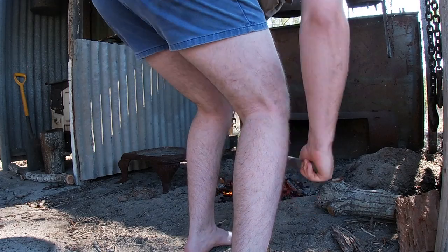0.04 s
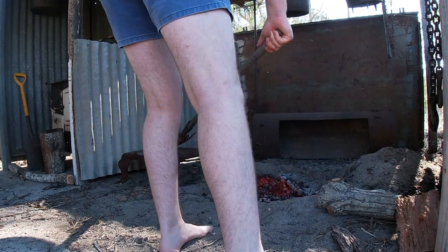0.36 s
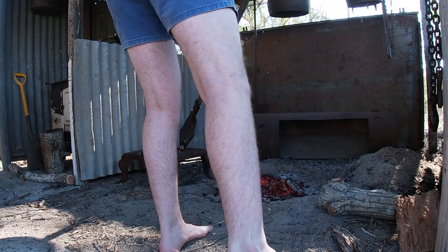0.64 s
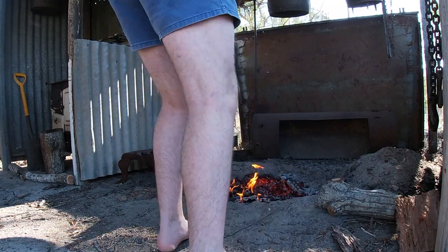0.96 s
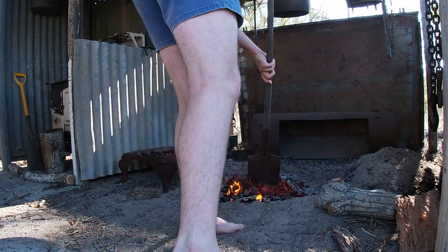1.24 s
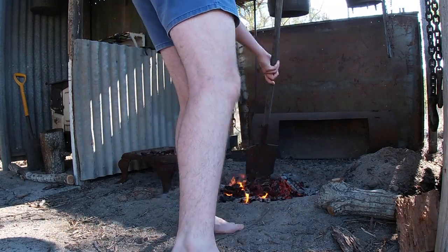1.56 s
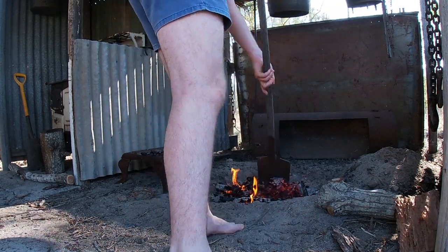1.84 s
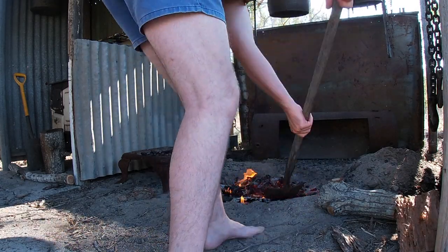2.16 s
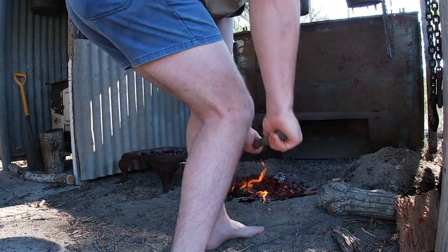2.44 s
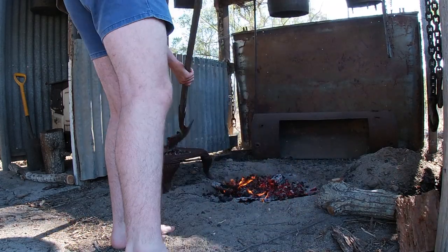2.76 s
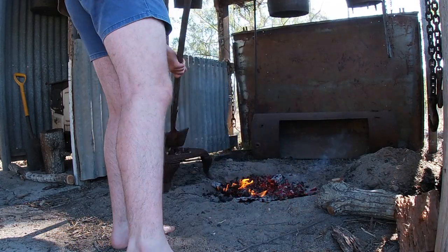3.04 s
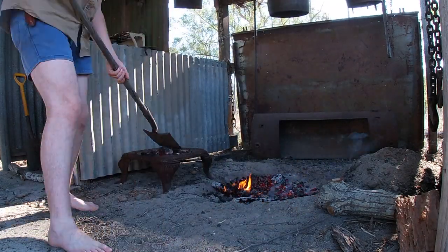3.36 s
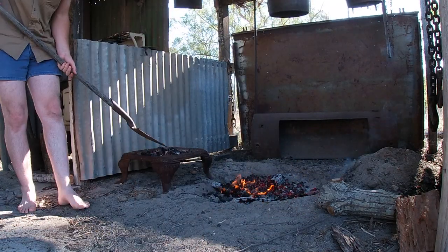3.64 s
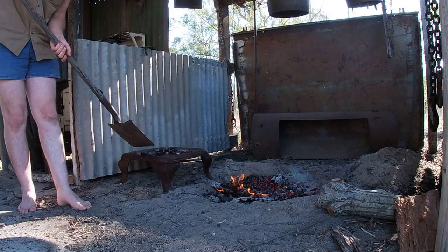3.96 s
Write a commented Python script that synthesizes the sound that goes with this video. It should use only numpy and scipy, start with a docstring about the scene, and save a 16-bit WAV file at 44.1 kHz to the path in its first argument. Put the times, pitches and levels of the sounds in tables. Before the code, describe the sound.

A steel shovel scrapes and crunches through embers and grit, then taps on metal.

```python
"""A steel shovel, close to a single microphone in a tin-walled yard, is dragged over sandy ground,
chops and scrapes through a bed of embers, then taps on an iron stand. Every contact crushes a shower
of grit against the blade, which rings when it is free and is damped in the coals. Behind it the embers
tick, a small bird chirps high above soft outdoor hiss and a low breeze, and the walls answer faintly."""
import sys
import numpy as np
from scipy import signal
from scipy.fft import rfft, irfft
from scipy.io import wavfile

SR = 44100
rng = np.random.default_rng(int(sys.argv[2]) if len(sys.argv) > 2 else 0)


def master(y):
    """Save y as 16-bit WAV."""
    cut = np.clip(np.atleast_2d(y).T, -1, 1)
    pcm = np.round(cut * 32767)  # scale
    wavfile.write(sys.argv[1], SR, pcm.astype(np.int16))


N = 176400
TIME = np.arange(N) / SR


def from_db(db):
    """Decibels to gain."""
    return 10 ** (np.asarray(db) / 20)


def rms_one(x):
    """Scale to unit rms."""
    return x / np.sqrt(np.mean(x ** 2) + 1e-20)


def through(x, response):
    """Pass a sound through an impulse response."""
    return signal.fftconvolve(x, response)[:len(x)]


def colour(x, points, size=8192):
    """Causal filter with the given spectrum, falling 12 dB an octave beyond its ends."""
    hz, db = np.transpose(points)
    f = np.maximum(np.arange(size // 2 + 1) * SR / size, 1)
    octaves_outside = np.maximum(np.log2(hz[0] / f), 0) + np.maximum(np.log2(f / hz[-1]), 0)
    gain = from_db(np.interp(np.log(f), np.log(hz), db) - 12 * octaves_outside)
    cepstrum = irfft(np.log(gain + 1e-5))
    cepstrum[1:size // 2] *= 2   # fold to minimum phase
    cepstrum[size // 2 + 1:] = 0
    return through(x, irfft(np.exp(rfft(cepstrum))))


def ring(force, hz, t60):
    """A unit click sets a tone of height 1 ringing."""
    r, w = from_db(-60 / (t60 * SR)), 2 * np.pi * hz / SR
    return signal.lfilter([.5, 0, -.5], [1, -2 * r * np.cos(w), r * r], force + 1e-18)


def dying_noise(t60, size):
    """A diffuse decay of unit energy."""
    tail = rng.standard_normal(size) * from_db(-60 * TIME[:size] / t60)
    return tail / np.linalg.norm(tail)


def wander(per_s, size):
    """A random curve that glides to a new value so many times a second."""
    values = rng.standard_normal(size // 40)
    return np.interp(TIME[:size] * per_s, np.arange(len(values)), values)


def add(track, s, sound):
    """Mix a sound in at a time."""
    start = int(np.clip(s * SR, 0, N - 1))
    track[start:start + len(sound)] += sound[:N - start]


def grain_db(size):
    """Random strengths of tiny cracks: most are weak, a few up to 12 dB louder."""
    return 3 * np.minimum(rng.exponential(1, size), 4)


def shower(length_s, swell_db=0, attack_s=0.0012, fall_db_per_s=668, judder_db=2.5, size=16384):
    """Grains crack at random as the blade catches and slips, each with a brief clatter of the sheet."""
    t = TIME[:size]
    grains_per_s = 6000
    grains = (rng.random(size) < grains_per_s / SR) * rng.choice([-1, 1], size)
    judder = wander(per_s=265, size=size)
    grains = grains * from_db(grain_db(size) + judder_db * judder)
    rise_db = swell_db * np.minimum(t / length_s - 1, 0)
    fall_db = fall_db_per_s * np.maximum(t - length_s, 0)
    press = np.minimum(t / attack_s, 1) * from_db(rise_db - fall_db)
    clatter = from_db(-1) * dying_noise(t60=0.028, size=2048)
    clatter[0] = 1   # the crack itself
    return rms_one(through(grains * press, clatter)) * np.sqrt(np.mean(press ** 2))


# Modes of the steel blade: (frequency [Hz], level pressed down [dB], level ringing free [dB])
BLADE_MODES = [(939, -3.5, -16.5), (1450, 9, -33), (1600, -16, -27), (1776, -32, -23.5), (1962, -17, -27.5),
               (2276, -1, -25.5), (2560, -7, -28), (2887, 5.5, -20.5), (3460, -6, -20), (4233, 3, -19.5),
               (4626, 6, -20.5), (4998, 10, -18.5), (5580, 2, -16.5), (6180, 3, -23), (6920, 2.5, -19.5),
               (7120, 4, -27.5), (7460, -10, -12), (8190, 1.5, -23), (9540, -1.5, -19), (10190, 3.5, -19),
               (11250, 1.5, -36), (11610, 1.5, -16), (12200, 9, -30), (13900, -9, -23), (15400, 10, -32)]
MODE_HZ, _, FREE_DB = np.transpose(BLADE_MODES)
IS_LOW = MODE_HZ < 2800
FREE_T60_S = np.where(IS_LOW, 0.065, 0.15)


def pressed_blade(x, width_hz=188):
    """Held against the ground, the blade colours the grit with broad, damped resonances."""
    t60 = np.log(1000) / (np.pi * width_hz)
    gain = from_db(-2.5) * np.pi * width_hz / SR
    modes = sum(gain * from_db(db) * ring(x * contact(), hz, t60) for hz, db, _ in BLADE_MODES)
    return from_db(-4) * x + modes


def contact(spread_db=3.5):
    """How well the wandering point of contact drives one mode."""
    return rms_one(from_db(spread_db * wander(per_s=35, size=N)))


# Slides over the ground, close up:
# (time [s], length [s], end level [dB], swell [dB], body [dB], coal rumble [dB], blade ring [dB])
SLIDES = [(0.0, 0.16, -57.5, -15.5, 0, -4, -4), (0.431, 0.027, -39, -6.5, -1, -19, 0),
          (0.51, 0.13, -35.5, 7, 2, -16, 8.5), (0.686, 0.049, -44.5, 5, 6.5, -8, 0),
          (1.198, 0.086, -26, 7.5, 1.5, -1, 3.5), (1.441, 0.05, -26, 11.5, 3.5, 3, 0),
          (1.499, .025, -36, 25, 1.5, 3, -12), (1.667, 0.023, -33.5, -7, 3, 2.5, 1),
          (1.802, 0.02, -52.5, -2, 19.5, 20, -11), (1.846, 0.041, -32.5, -2, 6.5, 2.5, 0.5),
          (2.144, 0.071, -28, 9.5, 2.5, -2, -1), (2.28, 0.051, -31, 4, 3.5, 1, -10),
          (2.343, 0.26, -49, -2.5, 5.5, 6, -9), (2.786, 0.15, -44.5, 0.5, 3.5, -10, 15.5),
          (3.102, 0.011, -30, 10, 4, -22, -21), (3.334, 0.054, -49.5, -3, 11.5, -5, -14),
          (3.406, 0.041, -41.5, -2.5, 7.5, -18, -12), (3.603, 0.021, -37.5, 10, 2.5, -20, 0)]
# Rumble of the shifting coals: (frequency [Hz], gain [dB])
RUMBLE_SPECTRUM = [(120, -18.5), (340, -22), (560, -0.5), (750, -4), (1300, 2.5), (2500, -19.5)]


def scrapes():
    """Sliding crushes grit, rubs the modes and shifts coals. Returns grit, body, ring with rumble."""
    grit, body, rumble, rub = np.zeros((4, N))
    for s, length_s, db, swell_db, body_db, rumble_db, ring_db in SLIDES:
        crunch = from_db(db) * shower(length_s, swell_db)
        add(grit, s, crunch)
        add(body, s, from_db(body_db) * crunch)
        add(rumble, s, from_db(rumble_db) * crunch)
        add(rub, s, from_db(ring_db - 30.5) * crunch)
    rubbed = sum(from_db(db) * ring(rub * contact(), hz, t60)
                 for db, hz, t60 in zip(FREE_DB, MODE_HZ, FREE_T60_S))
    return np.array([grit, body, rubbed + colour(rumble, RUMBLE_SPECTRUM)])


# Bright crackle of grit: (frequency [Hz], gain [dB])
GRIT_SPECTRUM = [(1500, -21), (3000, -9.5), (4700, -0.5), (7300, 5), (9000, 5), (12000, 3.5), (14000, 4.5),
                 (16000, -3.5)]
# Midrange body of the crunch: (frequency [Hz], gain [dB])
BODY_SPECTRUM = [(300, -21), (550, -17.5), (760, -23.5), (960, -3), (1500, -3.5), (2300, 0), (3800, 0.5),
                 (6500, -33.5)]


def shovel():
    """The foreground: the crunch sounds through the pressed blade, and the free steel rings over it."""
    grit, body, resonance = scrapes() + hits()
    crunch = colour(grit, GRIT_SPECTRUM) + colour(body, BODY_SPECTRUM)
    return pressed_blade(crunch) + resonance + knocks() + rasps() + singing_blade()


# Open-air hiss of the yard: (frequency [Hz], gain [dB])
HISS_SPECTRUM = [(15, -47), (25, -31.5), (144, -11.5), (227, -9), (552, -2), (1050, 0.5), (3090, -3.5),
                 (15500, -14)]
# Low rush of the breeze: (frequency [Hz], gain [dB])
BREEZE_SPECTRUM = [(20, -3), (60, 5.5), (120, 5), (250, 2.5), (500, -24)]
# The breeze at the microphone: (time [s], level [dB])
BREEZE_LEVELS = [(0, -61.5), (0.45, -68.5), (1.35, -91), (1.55, -67), (3.1, -81), (3.88, -62), (4, -66)]


def air():
    """Steady outdoor hiss and a light, low breeze that comes and goes."""
    hiss = rms_one(colour(rng.standard_normal(N), HISS_SPECTRUM))
    breeze = rms_one(colour(rng.standard_normal(N), BREEZE_SPECTRUM))
    breeze_db = np.interp(TIME, *np.transpose(BREEZE_LEVELS))
    return from_db(-47.5) * hiss + from_db(breeze_db) * breeze


def embers(ticks_per_s=30):
    """The bed of coals gives sparse, tiny ticks as it burns."""
    clicks = (rng.random(N) < ticks_per_s / SR) * from_db(-39 + grain_db(N))
    return colour(through(clicks, dying_noise(t60=0.014, size=2048)), GRIT_SPECTRUM)


# Chops and taps, close up: (time [s], level [dB], crushing time [s], body [dB], blade ring [dB])
STRIKES = [(0.192, -39.5, 0.0031, -13, -23), (0.401, -32.5, 0.013, 6, -14), (0.448, -41.5, 0.0043, 20, -15),
           (0.482, -37.5, 0.0027, -2, 10.5), (0.539, -36, 0.0045, 10.5, -14),
           (0.567, -40, 0.0044, 14.5, -12), (0.635, -30, 0.019, 6, 6), (0.653, -25, 0.0047, -7, 10),
           (0.722, -36, 0.0015, 12.5, -4), (0.858, -25.5, 0.0047, -21, -17),
           (0.867, -23.5, 0.0048, -3.5, -3), (1.167, -24, 0.0092, -2, -6), (1.208, -33, 0.0044, -10, -15),
           (1.257, -27.5, 0.0096, 4.5, -5), (1.413, -28, 0.011, -0.5, 1.5), (1.472, -29, 0.0036, 7.5, -19),
           (1.642, -24, 0.012, 3.5, -1), (1.674, -27.5, 0.0082, 2.5, -11), (1.819, -21.5, 0.0061, 3, -32),
           (1.865, -23.5, 0.009, -1, -9), (1.884, -25, 0.0033, -5, -18), (2.121, -32.5, 0.0078, -6.5, 12),
           (2.136, -26.5, 0.0024, -34, 2), (2.176, -28, 0.012, -1.5, -1), (2.226, -26.5, 0.006, -5, 4),
           (2.711, -37.5, 0.003, -5, 5.5), (2.850, -35, 0.0054, 9, -0.5), (2.865, -29.5, 0.0043, -18, -14),
           (2.899, -31.5, 0.0052, -13, -3), (3.072, -25, 0.01, 2, 6.5), (3.095, -35, 0.0036, 5, -6),
           (3.201, -20.5, 0.0045, 1.5, -6), (3.386, -29.5, 0.0073, 5, -7.5),
           (3.424, -33.5, 0.0045, -16, 9.5), (3.557, -34, .009, 2.5, 11), (3.577, -31.5, 0.0051, -3.5, 6),
           (3.623, -34.5, 0.0069, 5.5, 8.5), (3.702, -27.5, 0.0051, 3, -7.5), (3.757, -33, 0.0095, 5, 4),
           (3.826, -21.5, 0.0063, 2, -19), (3.914, -23, 0.011, 3.5, -25)]


def hits():
    """Each hit crushes a burst of grit and strikes the blade's modes. Returns grit, body, ring."""
    grit, body, struck = np.zeros((3, N))
    for s, db, length_s, body_db, ring_db in STRIKES:
        crunch = from_db(db) * shower(length_s, attack_s=0.002, fall_db_per_s=1369, judder_db=0)
        add(grit, s, crunch)
        add(body, s, from_db(body_db) * crunch)
        add(struck, s, blow(db + ring_db + body_db * IS_LOW, length_s))
    return np.array([grit, body, struck])


def blow(levels_db, contact_s, size=4096):
    """One contact sets the modes ringing; the load on the blade detunes them a little each time."""
    count = len(MODE_HZ)
    detune, scatter_db = rng.standard_normal((2, count))
    hz = MODE_HZ * (1 + 0.0046 * detune)
    t = np.maximum(TIME[:size, None] - contact_s * rng.random(count), 0)
    tones = np.sin(2 * np.pi * hz * t) * np.exp(-np.log(1000) * t / FREE_T60_S)
    gains = from_db(levels_db + FREE_DB + scatter_db) * (-1) ** np.arange(count)
    bass_cut = signal.butter(2, 810, "high", fs=SR, output="sos")   # the ringing carries no low thump
    return signal.sosfilt(bass_cut, tones @ gains)


# Thin chirps in the background: (time [s], level [dB])
CHIRPS = [(0.384, -46), (0.422, -46), (1.066, -49), (1.098, -48)]


def bird(low_hz=7300, top_hz=10600, chirp_s=0.027, pip_s=0.014):
    """A small bird whistles quick upward arcs and one lower, level pip."""
    out = np.zeros(N)
    arc = np.sin(np.linspace(0, 2.1, int(chirp_s * SR))) ** 2
    for s, db in CHIRPS:
        add(out, s, from_db(db) * whistle(low_hz + (top_hz - low_hz) * arc))
    pip = whistle(hz=np.full(int(pip_s * SR), 3600))
    add(out, 1.05, from_db(-37) * pip)
    return out


def whistle(hz):
    """A pure tone along a pitch track, fading in and out."""
    return np.sin(2 * np.pi * np.cumsum(hz) / SR) * np.sin(np.linspace(0, np.pi, len(hz)))


# Heavy knocks on the blade: (time [s], level [dB])
DULL_KNOCKS = [(0.449, -5), (0.636, -9.5), (0.652, -11.5)]


def knocks():
    """Dull blows shake only the blade's low modes."""
    out = np.zeros(N)
    for s, db in DULL_KNOCKS:
        add(out, s, blow(np.where(IS_LOW, db, -np.inf), contact_s=0.002))
    return out


# The edge on sand or iron: (time [s], length [s], level [dB])
EDGE_RASPS = [(0.486, 0.0049, -37.5), (2.175, 0.06, -40), (2.291, 0.042, -40), (3.912, 0.0071, -32)]


def rasps():
    """The grating edge drives the blade's middle modes."""
    force = np.zeros(N)
    for s, length_s, db in EDGE_RASPS:
        add(force, s, from_db(db) * shower(length_s))
    tones = sum(ring(force, hz, t60=0.04) for hz in MODE_HZ if 2800 < hz < 5200)
    return rms_one(tones) * np.std(force)


# The blade springs free: (time [s], level [dB])
RELEASES = [(0.584, -43), (0.654, -31), (3.206, -41), (3.428, -43.5), (3.919, -43)]


def singing_blade():
    """Once the blade is released, its purest mode sings on."""
    force = np.zeros(N)
    for s, db in RELEASES:
        add(force, s, from_db([db]))
    return ring(force, hz=3005, t60=0.58)


def yard(x, delay_s=0.0089, dull_hz=5800):
    """Faint, dull reflections from the tin walls travel some three metres farther to the microphone."""
    out = np.zeros(N)
    add(out, delay_s, through(x, dying_noise(t60=0.31, size=22050)))
    return from_db(-17) * signal.lfilter(*signal.butter(1, dull_hz, fs=SR), out)


def scene():
    """Shovel, embers and bird, heard in mono from one spot in the yard."""
    direct = shovel() + embers() + bird()
    return (direct + yard(direct) + air())[None]


def record(dry, cutoff_hz=15850):
    """The microphone chain cuts the very top steeply."""
    return signal.sosfilt(signal.ellip(12, .1, 80, cutoff_hz, fs=SR, output="sos"), dry)


dry = scene()
out = record(dry)
master(out)
```